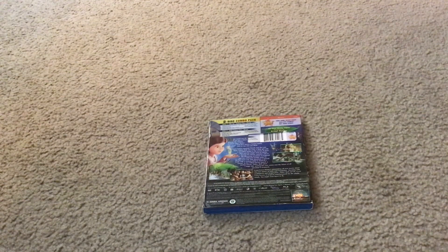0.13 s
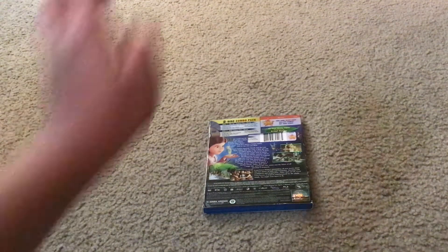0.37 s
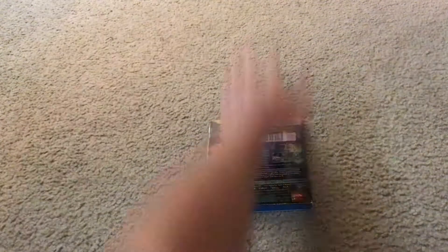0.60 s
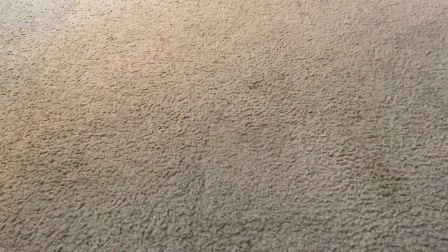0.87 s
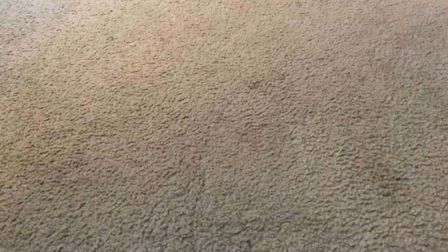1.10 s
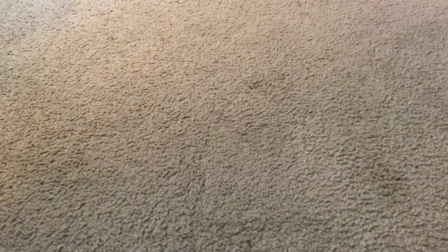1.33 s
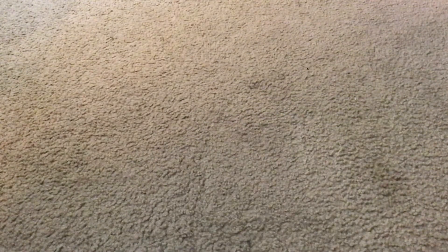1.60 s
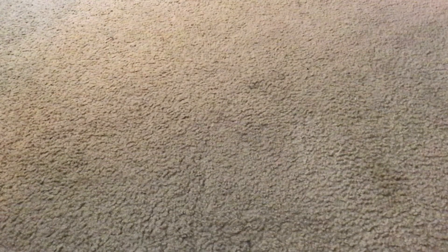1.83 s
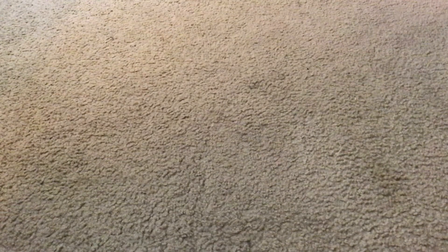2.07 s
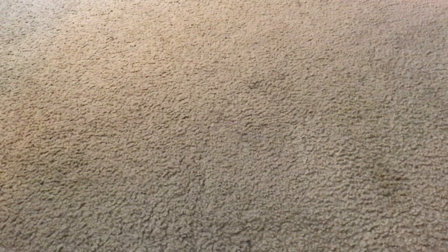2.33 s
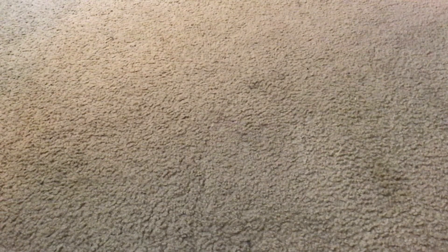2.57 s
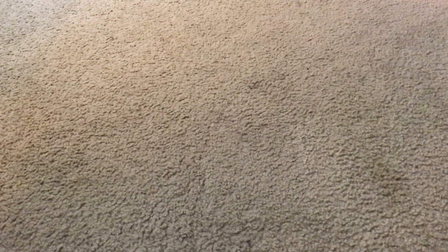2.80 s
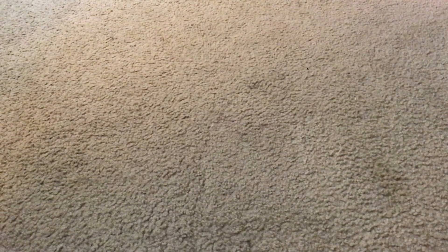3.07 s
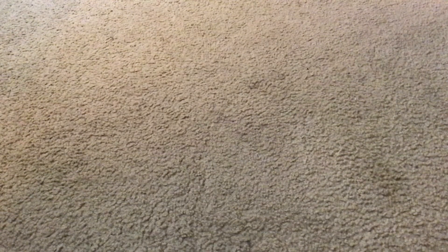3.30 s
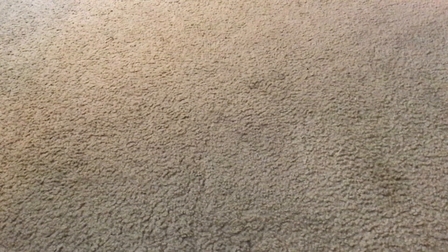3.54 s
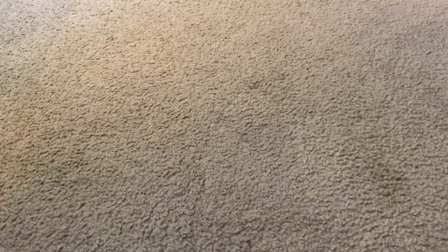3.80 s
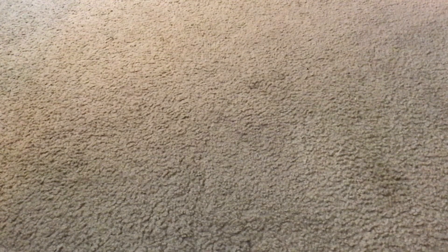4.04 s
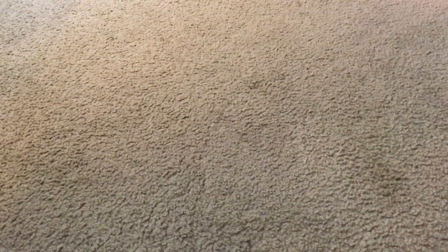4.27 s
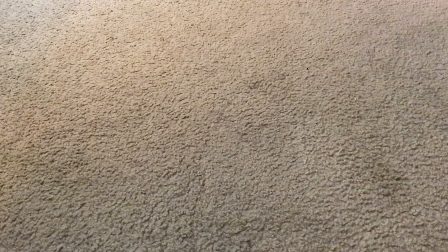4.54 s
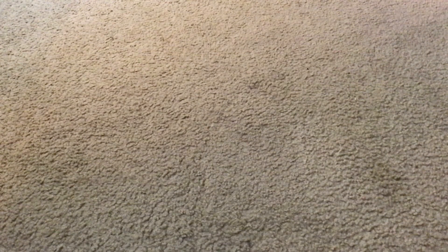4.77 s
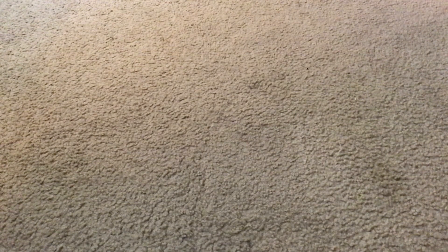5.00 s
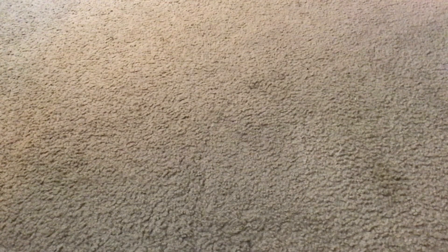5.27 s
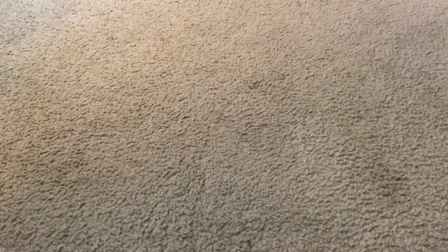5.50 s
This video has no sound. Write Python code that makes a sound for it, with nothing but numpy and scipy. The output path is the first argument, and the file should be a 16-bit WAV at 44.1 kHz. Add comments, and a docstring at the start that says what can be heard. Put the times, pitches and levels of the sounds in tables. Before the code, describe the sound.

A hand slaps a plastic disc case on carpet, drags it off with a scrape, then handles it with light clicks and a sharp snap open.

```python
"""Small soft carpeted room with drifting air and a wavering mains hum: noise and a tone.
A hand slaps onto a plastic disc case, drags it away, turns it over and snaps it open.
Knocks: slip chatter cracks and strikes the modes of the hollow shell; sparse echoes follow.
Rubbing of hands, sleeve and carpet: dense fibre slips. Faint squeak and chirps: shaky tone, narrow noise.
The small microphone has a strong treble resonance."""
import sys
import numpy as np
from scipy import signal
from scipy.fft import rfft, irfft
from scipy.io import wavfile
from scipy.ndimage import uniform_filter1d

SR = 44100
rng = np.random.default_rng(int(sys.argv[2]) if len(sys.argv) > 2 else 0)


def natural_amplitude(level_db):
    """Convert a level in decibels to a linear amplitude factor, elementwise."""
    exponent = np.asarray(level_db, float) / 20
    return 10 ** exponent


def int16_out(signal):
    """Quantize to a 16-bit WAV file."""
    q = np.round(np.clip(np.atleast_2d(signal).T, -1, 1) * 32767)
    wavfile.write(sys.argv[1], SR, q.astype(np.int16))


N = 248371

# room air spectrum: f/Hz, relative level/dB
AIR_SPECTRUM = [(25, -35), (45, -7), (70, 9), (100, 11.5), (160, -19.5), (300, -21), (800, -25),
                (1200, -37.5), (4000, -36), (6800, -37.5), (11000, -39), (14000, -59.5), (16000, -54.5)]
AIR_RMS_DB = -60.5
# hum: f/Hz, rms level of the steady tone/dB, width of the waver/Hz
HUM_TONES = [(119.8, -61, 18.1)]
# echo decay: f/Hz, t60/s
ROOM_DECAY = [(100, .09), (300, .13), (700, .22), (1250, .26), (2500, 0.24), (5000, 0.21), (13000, 0.15)]
ROOM_DB = -10.5
# microphone port resonances: f/Hz, width/Hz, level/dB
PORT_RESONANCES = [(8810, 570, -6), (9670, 1235, 0)]

# faint thin chirps: centre t/s, length/s, f/Hz, width of each of two resonances/Hz, rms before fades/dB
CHIRPS = [(5.17, 0.12, 8900, 57, -82), (2.075, .045, 1300, 87, -73.5)]
# plastic squeak: start t/s, length/s, f/Hz, level/dB
PLASTIC_SQUEAK = (1.19, .15, 1900, -77)

# rubbing spectra: f/Hz, relative level/dB
HISS_SPECTRUM = [(1800, -59), (3500, 1.5), (5000, 8.5), (6800, 4.5), (10000, 13), (13000, 0), (16000, -7)]
RUMBLE_SPECTRUM = [(100, -4), (200, 9), (330, 6), (600, 1), (900, -6), (1300, -50)]
RASP_SPECTRUM = [(700, -31), (1200, 3), (2000, 5), (4000, 0), (5500, -16)]
# strokes of hands, sleeve and carpet: start t/s, hold/s, fade/(s per 20 dB), pressure level/dB,
# shell rumble level/dB
RUB_STROKES = [(0.1, .1, .15, -84, -70), (0.36, .23, .1, -78, -75), (0.7, .12, .15, -55.5, -59),
               (0.83, .02, .12, -54, -52), (0.86, .05, .12, -51, -48), (0.93, .02, .1, -57, -56),
               (0.965, .025, .1, -55, -58), (1.01, .012, .06, -54, -56), (1.032, .015, .06, -52, -54),
               (1.06, .04, .25, -59, -62), (1.6, .02, .06, -76, -73), (1.72, .04, .15, -71, -76),
               (1.99, .03, .1, -76, -76), (2.08, .08, .1, -88, -68), (2.222, .045, .08, -66, -66),
               (2.364, .01, .03, -49, -76), (2.385, .025, .05, -48, -74), (2.436, .025, .045, -47.5, -68),
               (2.49, .01, .08, -67, -68), (2.69, .04, .06, -76, -72), (2.82, .02, .08, -78, -62),
               (3.04, .06, .1, -74, -76), (3.162, .015, .07, -70, -78), (3.32, .05, .3, -76, -71),
               (3.7, .04, .1, -77, -78), (3.975, .02, .05, -64, -76), (4.03, .03, .1, -64, -72),
               (4.47, .02, .1, -62, -68), (4.625, .07, .05, -72, -80)]
ONSET_SHARE = .27  # a stroke swells in this share of its fade time
FIDGET_HISS_DB, FIDGET_RUMBLE_DB, FIDGET_SWING_DB = -89, -78, 4.  # hands never rest
DRAG_RING_DB = 3  # shell modes under the rumble
RASP_DB, GRIP_S = -7, .07  # rasp re pressure; lag as the surfaces grip

# modes of the hollow case: f/Hz, relative level/dB, t60/s
SHELL_MODES = [(128, -5, .035), (152, -8, .03), (190, -3.5, .03), (240, -6, 0.019), (293, -5, 0.04),
               (371, -2.5, 0.014), (503, -9.5, 0.015), (600, -9, 0.011), (710, -6.5, 0.022),
               (880, -6, 0.017), (1030, -6, 0.017), (1130, -9, .016), (1260, -8.5, .016),
               (1380, -10.5, 0.008), (1529, -7, 0.0097), (1928, -9, 0.007), (2100, -7, .007),
               (2475, -6.5, 0.0061), (2843, -8, .007), (3150, -7, .007), (3500, -10, 0.006),
               (3880, -10, 0.006), (4400, -9, .005), (4850, -8, .006), (6100, -8, .005), (6600, -8, .004)]
# crack spectrum: f/Hz, relative level/dB
CRACK_SPECTRUM = [(1500, -36), (2800, -6), (4200, 0), (5500, 1.5), (6800, -3), (10000, -0.5), (13000, -16),
                  (16000, -27)]
# contacts of the case: t/s, crack level/dB, shell level/dB, shell centre f/Hz, thump level/dB
CASE_KNOCKS = [(0.6267, -21, -28, 870, -30), (0.6288, -15, -14.5, 820, -27), (0.6297, -20, -25, 3700, -40),
               (0.6318, -28, -20, 900, -36), (0.633, -21, -24, 1700, -27), (0.6357, -16, -32, 300, -30),
               (0.6377, -15, -22, 1950, -28), (0.6405, -30, -29, 600, -34), (0.6445, -31, -30, 280, -19.5),
               (0.6515, -32, -34, 300, -32), (0.6545, -32, -42, 4000, -42), (0.771, -42, -56, 1600, -56),
               (0.866, -50, -40, 380, -48), (0.89, -56, -41, 290, -48), (0.947, -56, -44, 330, -52),
               (1.015, -52, -45, 1600, -48), (1.038, -46, -46, 1900, -43), (1.351, -41, -54, 1500, -66),
               (1.581, -60, -63, 1500, -55), (1.611, -62, -62, 3500, -70), (1.776, -55, -59, 1420, -75),
               (2.22, -47, -46, 640, -53), (2.2315, -47, -47, 720, -60), (2.244, -54, -54, 3900, -62),
               (2.2465, -51, -47, 640, -62), (2.446, -42, -41, 800, -67), (2.462, -46, -44, 760, -75),
               (2.738, -75, -62, 300, -42), (2.7465, -75, -48, 600, -44), (2.7536, -40, -33, 1500, -50),
               (2.7565, -50, -36, 1900, -55), (2.7575, -55, -32, 720, -55), (2.7595, -46, -31, 1350, -55),
               (2.7605, -54, -44, 3000, -65), (2.765, -54, -34, 1500, -54), (2.769, -60, -36, 650, -52),
               (2.7725, -52, -44, 2200, -60), (2.774, -65, -40, 310, -60), (2.7765, -60, -33, 690, -55),
               (2.785, -62, -42, 310, -60), (2.782, -64, -46, 1700, -65), (2.789, -64, -52, 2600, -55),
               (2.794, -64, -51, 3000, -70), (2.803, -64, -52, 2500, -70), (2.798, -64, -42, 380, -55),
               (2.812, -66, -46, 720, -55), (2.82, -66, -53, 1700, -58), (2.9917, -33, -35, 700, -42.5),
               (2.9945, -38, -42, 1000, -46), (2.997, -41, -46, 4800, -44), (3.0005, -42, -46, 3300, -58),
               (3.014, -49, -48, 750, -65), (3.162, -59, -55, 1173, -68), (3.295, -47, -42, 1100, -56),
               (3.297, -47, -47, 1900, -65), (3.302, -46, -53, 3600, -54.5), (3.374, -75, -60, 1250, -80),
               (3.389, -61, -57, 3800, -70), (3.477, -64, -59, 1230, -71), (3.593, -70, -64, 2000, -80),
               (3.768, -55, -57, 1284, -70), (3.9515, -29, -27, 3150, -65), (3.9537, -29, -39, 3500, -70),
               (3.954, -50, -35, 1300, -65), (3.964, -44, -50, 1340, -61), (3.9755, -43, -52, 5600, -70),
               (3.9773, -55, -39, 1280, -65), (3.9993, -34, -33, 6300, -60), (4.0, -28, -39, 2300, -60),
               (4.0015, -33, -30, 1280, -50), (4.003, -38, -36, 6300, -44), (4.012, -44, -46, 3800, -65),
               (4.0205, -44, -48, 1200, -65), (4.03, -50, -48, 4000, -70), (4.141, -57, -54, 1300, -63),
               (4.234, -36, -42.5, 1100, -65), (4.2355, -46, -47, 2600, -70), (4.4106, -28, -36, 4800, -50),
               (4.4113, -15, -22.5, 1030, -33), (4.4118, -30, -28, 4800, -50), (4.4138, -28, -29, 900, -34),
               (4.4227, -18, -25, 1150, -40), (4.4243, -28, -28, 2050, -50), (4.4303, -29, -33, 1050, -46),
               (4.441, -38, -35, 2000, -54), (4.458, -50, -42, 1100, -60), (4.626, -65, -66, 3200, -72),
               (4.66, -40, -48, 3800, -62), (4.663, -55, -52, 1500, -62), (4.98, -59, -69, 1300, -67)]
PUSH_S, CHATTER_GAIN, FIRST_SLIP_GAIN = .00006, .32, 2.
RIM_DB = -12  # the thin rim rings with the crack, this much under it


def evened(x):
    """Scales to unit rms."""
    return x / np.sqrt(np.mean(x ** 2) + 1e-20)


def read(points, f_hz):
    """Interpolates a table over log frequency."""
    f, value = np.transpose(points)
    return np.interp(np.log(f_hz + 1), np.log(f + 1), value)


def add(mix, start_s, sound):
    """Adds a sound in place, cut at the end of the mix."""
    part = mix[round(start_s * SR):][:len(sound)]
    part += sound[:len(part)]


def coloured(x, spectrum):
    """Filters x by a table of f/Hz, level/dB."""
    gain = natural_amplitude(read(spectrum, np.fft.rfftfreq(len(x), 1 / SR)))
    return irfft(rfft(x) * gain, len(x))


def resonate(x, f_hz, width_hz):
    """One resonance of gain 1: a single complex pole."""
    pole = np.exp((2j * np.pi * f_hz - np.pi * abs(width_hz)) / SR)
    return 2 * signal.lfilter([1 - abs(pole)], [1, -pole], x).real


def microphone(x):
    """The port before the capsule lifts the treble band; the deepest bass is cut."""
    x = signal.sosfilt(signal.butter(2, 75., "high", fs=SR, output="sos"), x)
    return x + sum(natural_amplitude(db) * resonate(x, f_hz, width_hz) for f_hz, width_hz, db in PORT_RESONANCES)


def room_air():
    """Noise whose spectrum drifts in patches of time and frequency."""
    hz, _, z = signal.stft(rng.standard_normal(N + 1024), SR, nperseg=1024, noverlap=768)
    patches = uniform_filter1d(rng.standard_normal(z.shape), size=30, axis=0)
    patches = evened(uniform_filter1d(patches, size=20, axis=1))
    drift_db = 0.73 * patches * np.clip(hz / 1500, .2, 1)[:, None]  # steadier in the bass
    z = z * natural_amplitude(read(AIR_SPECTRUM, hz)[:, None] + drift_db)
    air = signal.istft(z, SR, nperseg=1024, noverlap=768)[1][:N]
    return natural_amplitude(AIR_RMS_DB) * evened(air)


def appliance_hum():
    """A steady tone plus narrow noise at its pitch, which makes it waver."""
    t = np.arange(N) / SR
    hum = np.zeros(N)
    for f_hz, db, width_hz in HUM_TONES:
        waver = evened(resonate(rng.standard_normal(N), f_hz, width_hz))
        hum += natural_amplitude(db) * (np.sqrt(2) * np.sin(2 * np.pi * f_hz * t) + 0.81 * waver)
    return hum


def room(x):
    """Sparse random-sign echoes, a decay per band; three random tails blend in turn: smooth, unstriped."""
    out = np.zeros(N)
    turn_rad = np.arange(N) / SR * 40.
    for k in range(3):
        taps = np.zeros(SR // 2)
        at = np.arange(120, SR // 2 - 20, 20)
        taps[at + rng.integers(0, 20, len(at))] = rng.choice([-1., 1.], len(at))
        hz, t, z = signal.stft(taps, SR, nperseg=256)
        decay = natural_amplitude(-60 * t / read(ROOM_DECAY, hz)[:, None])
        tail = signal.istft(z * decay, SR, nperseg=256)[1]
        share = np.sqrt(2 / 3) * np.cos(turn_rad + k * np.pi / 3)  # squares sum to 1
        out += signal.fftconvolve(x * share, tail / np.linalg.norm(tail))[:N]
    return out


def chirp(centre_s, length_s, f_hz, width_hz, db):
    """Noise through two equal resonances: a short narrow band. Returns start/s, sound."""
    count = round(length_s * SR)
    noise = rng.standard_normal(SR // 2)[:count]
    band = resonate(resonate(noise, f_hz, width_hz), f_hz, width_hz)
    return centre_s - length_s / 2, natural_amplitude(db) * evened(band) * signal.windows.tukey(count, .5)


def squeak():
    """Stick-slip of plastic on plastic: a shaky tone, two overtones. Returns start/s, sound."""
    start_s, length_s, f_hz, db = PLASTIC_SQUEAK
    t = np.arange(0, length_s, 1 / SR)
    shake = evened(uniform_filter1d(rng.standard_normal(SR // 4), size=100))[:len(t)]
    cycles = np.cumsum(f_hz * (1 + 0.037 * shake)) / SR
    tone = sum(natural_amplitude(d) * np.cos(2 * np.pi * k * cycles) for k, d in enumerate([2, 0, -8], 1))
    return start_s, natural_amplitude(db) * tone * signal.windows.tukey(len(t), .3)


def fibre_slips():
    """Dense tiny slips of random size, clumped by slow and fast surges."""
    size_db = 2.2 * np.minimum(rng.exponential(1, N), 5)
    slips = natural_amplitude(size_db) * rng.standard_normal(N) * (rng.random(N) < 22000 / SR)  # 22000 per s
    for surge_db, samples in ((1.5, 900), (1.7, 180)):
        slips *= natural_amplitude(surge_db * evened(uniform_filter1d(rng.standard_normal(N), size=samples)))
    return slips


def stroke_power():
    """Power of pressure and of rumble: wandering fidgets plus every stroke."""
    t = np.arange(N) / SR
    wander = uniform_filter1d(uniform_filter1d(rng.standard_normal((2, N)), size=3000), size=3000)
    fidget_db = np.array([[FIDGET_HISS_DB], [FIDGET_RUMBLE_DB]]) + FIDGET_SWING_DB * evened(wander)
    power = natural_amplitude(fidget_db) ** 2
    for start_s, hold_s, fade_s, pressure_db, rumble_db in RUB_STROKES:
        onset = np.maximum(start_s - t, 0) / (ONSET_SHARE * fade_s)
        release = np.maximum(t - start_s - hold_s, 0) / fade_s
        shape_db = np.maximum(-20 * (onset + release), -200)
        power = power + natural_amplitude(np.array([[pressure_db], [rumble_db]]) + shape_db) ** 2
    return power


def rubbing():
    """Fibre slips heard as hiss, late mid rasp and the rumble of the shell, which rings its modes."""
    slips = fibre_slips()
    pressure, rumble_gain = np.sqrt(stroke_power())
    hiss = coloured(slips, HISS_SPECTRUM)
    hiss /= microphone(hiss).std()
    keep = np.exp(-1 / (GRIP_S * SR))
    lagged = signal.lfilter([1 - keep], [1, -keep], pressure)
    grip = natural_amplitude(RASP_DB) * np.minimum(lagged, pressure)  # late to rise, prompt to fall
    rasp = evened(coloured(slips, RASP_SPECTRUM))
    rumble = coloured(slips, RUMBLE_SPECTRUM)
    ringing = sum(natural_amplitude(db + DRAG_RING_DB) * resonate(rumble, f_hz, 2.2 / t60_s)
                  for f_hz, db, t60_s in SHELL_MODES)
    return pressure * hiss + grip * rasp + rumble_gain * evened(rumble + ringing)


def slip_chatter(t, chance):
    """A brief burst of random slips; the loose halves keep rattling faintly."""
    settling = 0.075 * np.exp(-t / 0.016)
    contact = (np.exp(-t / 0.0009) + settling) * np.minimum(t * 2500, 1)
    return contact * chance[:4096] * (.5 + abs(chance[4096:8192]))


def shell_ring(t, chatter, crack_db, shell_db, shell_hz, thump_db, chance):
    """The contact drives every panel mode; where it lands sets which ring most."""
    hz, mode_db, t60_s = np.transpose(SHELL_MODES)[:, :, None]
    octaves_away = np.log2(hz / np.array([170, shell_hz, 3000]))  # thump, shell, rim
    part_gain = natural_amplitude([thump_db, shell_db, crack_db + RIM_DB])
    blow = (part_gain * natural_amplitude(-np.array([15, 40, 20]) * octaves_away ** 2)).sum(1, keepdims=True)
    detune, uneven = chance[8192:8192 + 2 * len(SHELL_MODES)].reshape(2, -1, 1)
    swell = (1 - np.exp(-2.5 * hz * t)) ** 2  # a panel takes part of a cycle to get moving
    modes = swell * natural_amplitude(-60 * t / t60_s) * np.sin(2 * np.pi * hz * (1 + 0.03 * detune) * t)
    push = np.exp(-t / PUSH_S) + CHATTER_GAIN * chatter  # one firm push, a little rattle
    rings = signal.fftconvolve(modes, push[None], axes=1)[:, :4096]
    rings = np.gradient(rings, axis=1)  # a small panel radiates poorly below its own pitch
    rings *= blow * natural_amplitude(mode_db + 1.5 * uneven) / abs(rings).max(1, keepdims=True)
    return rings.sum(0)


def knock(crack_db, shell_db, shell_hz, thump_db, chance):
    """A chatter of slips, sharpest at first, cracks and rings the shell."""
    t = np.arange(4096) / SR
    chatter = slip_chatter(t, chance)
    first_slip = abs(t - .0003) < .5 / SR
    crack = coloured(chatter + FIRST_SLIP_GAIN * first_slip, CRACK_SPECTRUM)
    crack[-512:] = 0  # clears filter wrap-around
    crack *= natural_amplitude(crack_db) / abs(microphone(crack)).max()  # peak level after the microphone
    return crack + shell_ring(t, chatter, crack_db, shell_db, shell_hz, thump_db, chance)


def scene():
    """Air and hum, rubbing, squeak and chirps, knocks; only the knocks excite the room."""
    back = room_air() + appliance_hum()
    case = rubbing()
    add(case, *squeak())
    for row in CHIRPS:
        add(case, *chirp(*row))
    hits = np.zeros(N)
    chances = rng.standard_normal((len(CASE_KNOCKS), 8300))
    for (start_s, *row), chance in zip(CASE_KNOCKS, chances):
        add(hits, start_s, knock(*row, chance))
    return (case + hits + natural_amplitude(ROOM_DB) * room(hits) + back)[None]


def roll_off(x):
    """The treble ends steeply here."""
    return signal.sosfilt(signal.butter(12, 16710, fs=SR, output="sos"), x)


def record(dry):
    """Applies the microphone colour to the mix."""
    mix = microphone(dry)
    return roll_off(mix)


dry = scene()
out = record(dry)
int16_out(out)
```